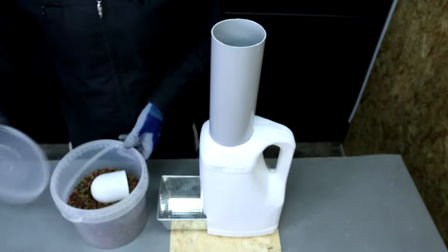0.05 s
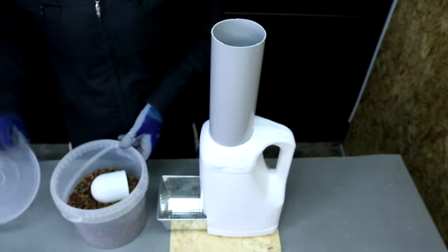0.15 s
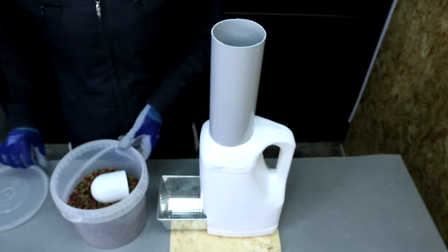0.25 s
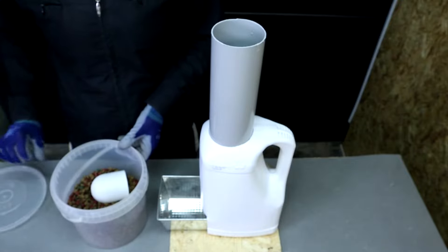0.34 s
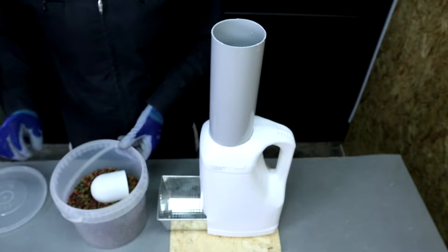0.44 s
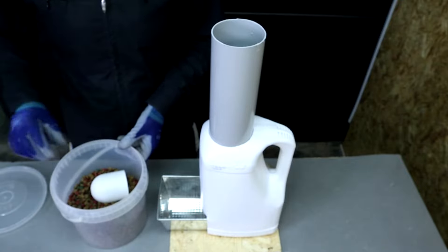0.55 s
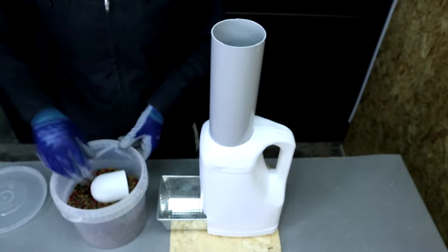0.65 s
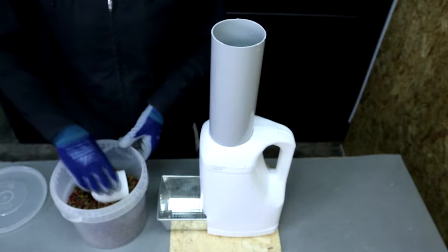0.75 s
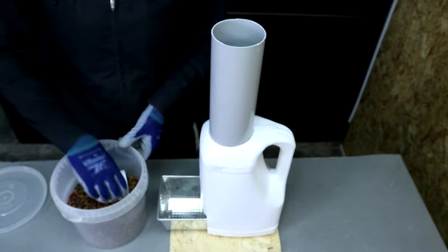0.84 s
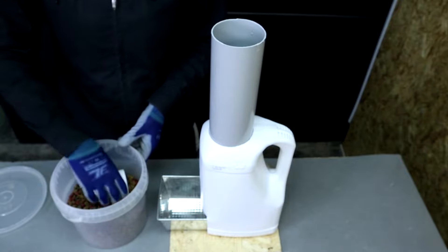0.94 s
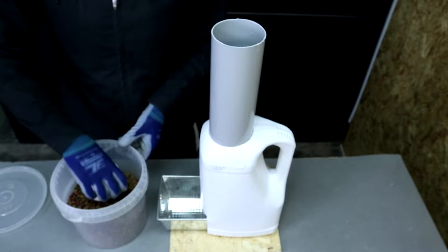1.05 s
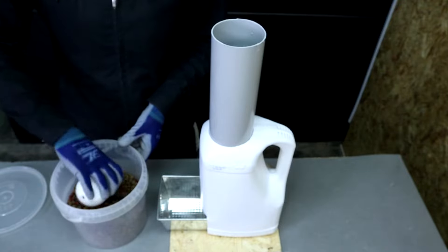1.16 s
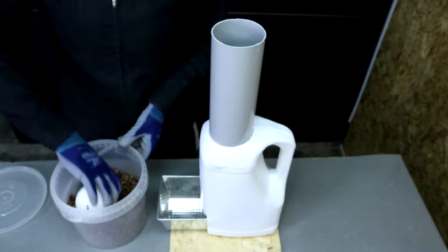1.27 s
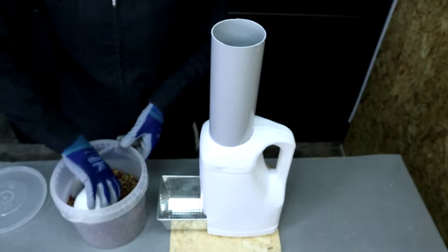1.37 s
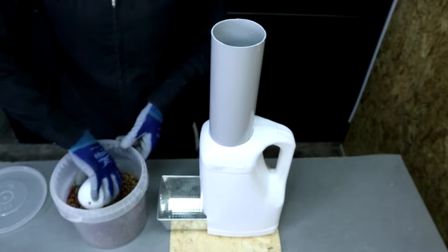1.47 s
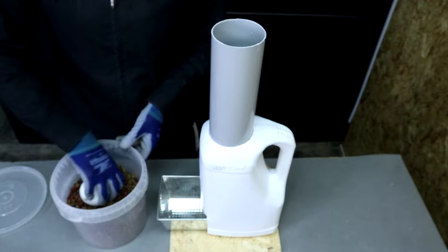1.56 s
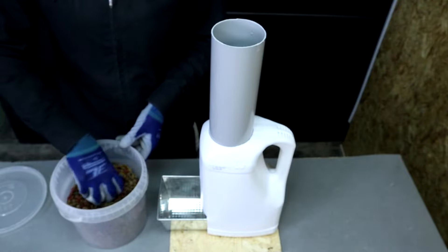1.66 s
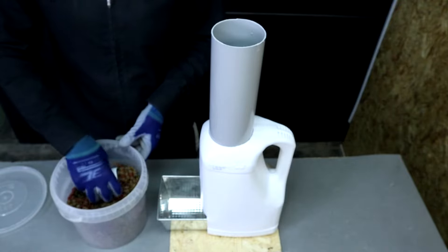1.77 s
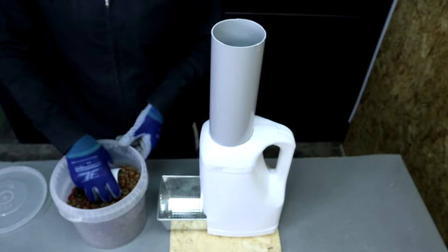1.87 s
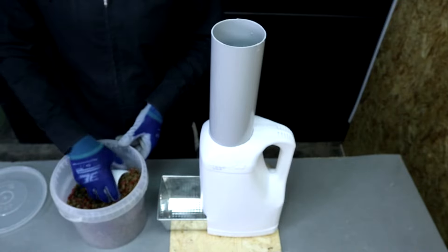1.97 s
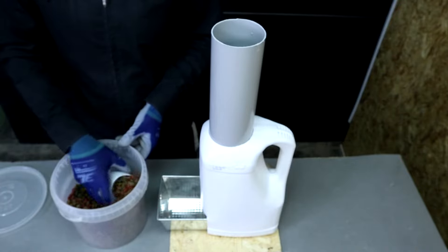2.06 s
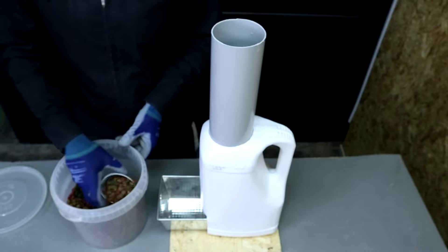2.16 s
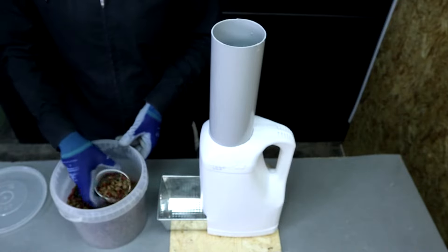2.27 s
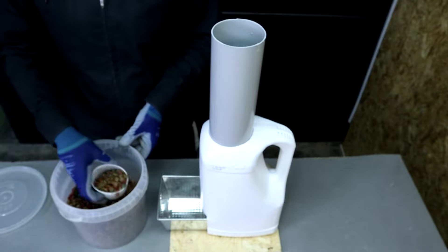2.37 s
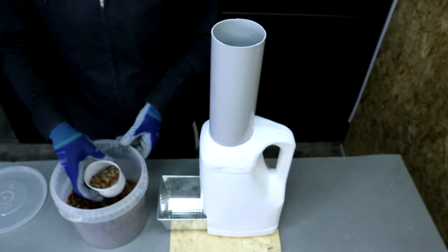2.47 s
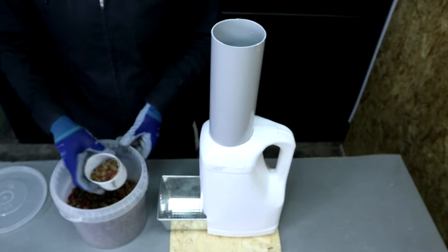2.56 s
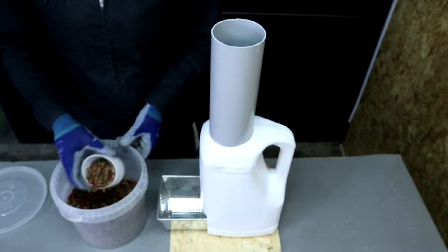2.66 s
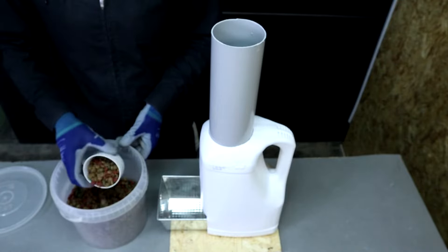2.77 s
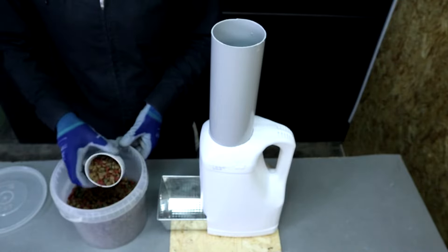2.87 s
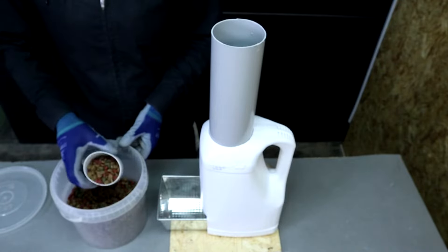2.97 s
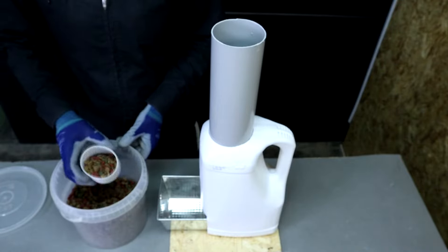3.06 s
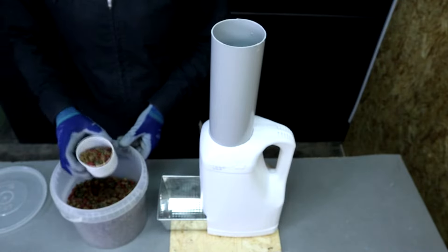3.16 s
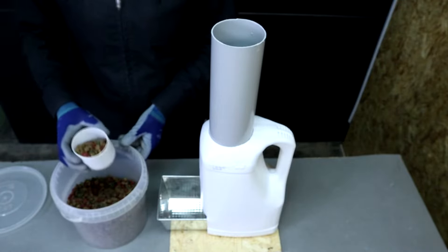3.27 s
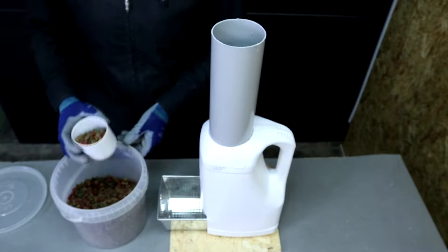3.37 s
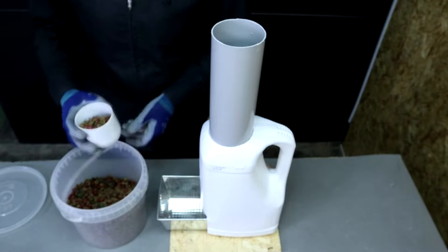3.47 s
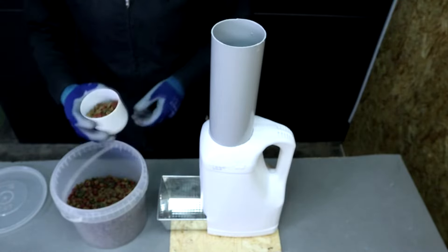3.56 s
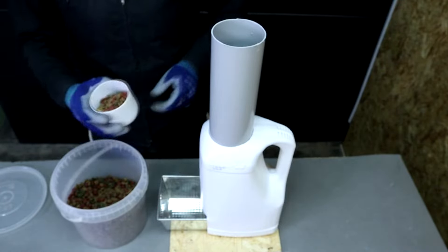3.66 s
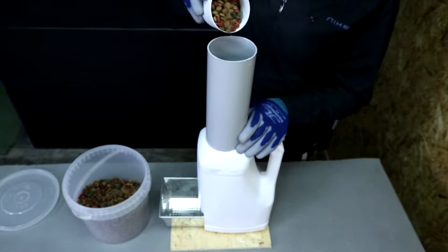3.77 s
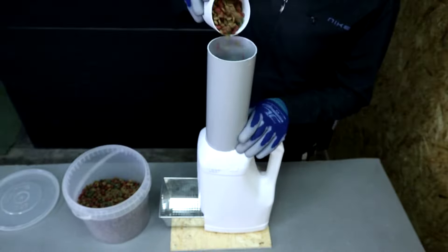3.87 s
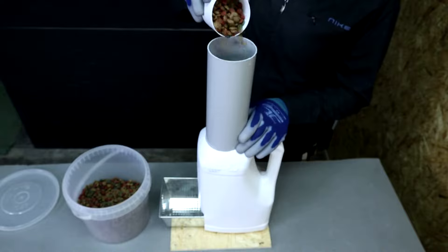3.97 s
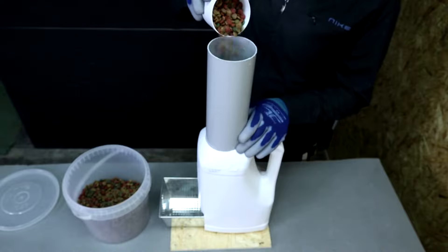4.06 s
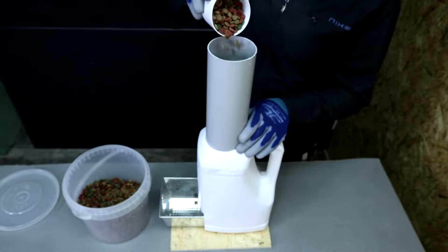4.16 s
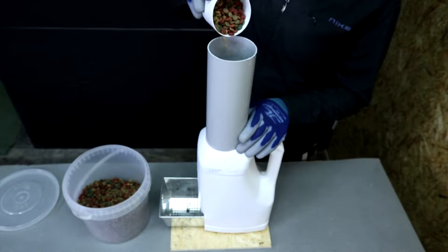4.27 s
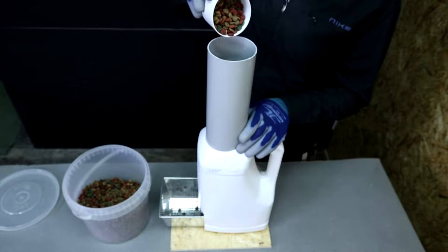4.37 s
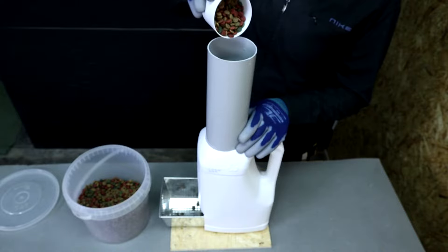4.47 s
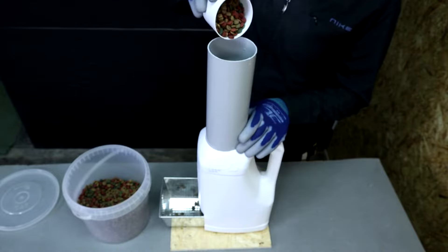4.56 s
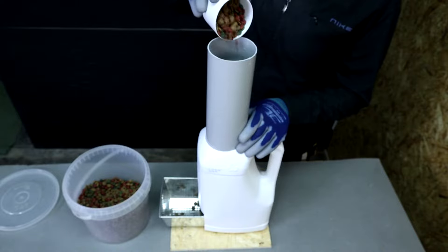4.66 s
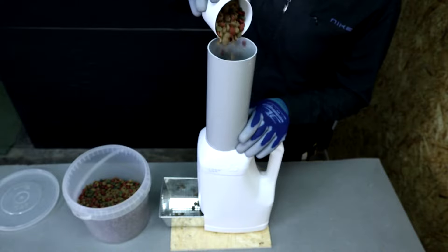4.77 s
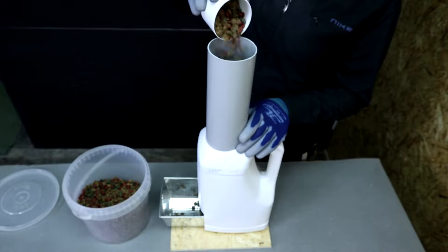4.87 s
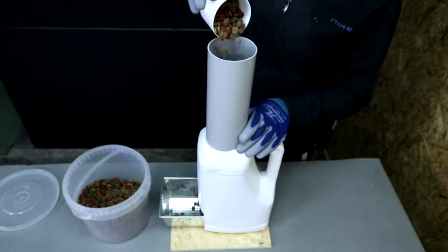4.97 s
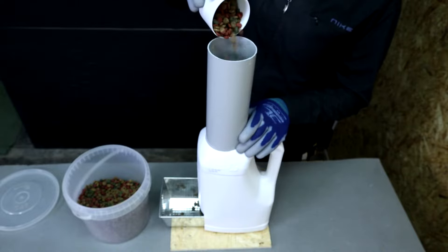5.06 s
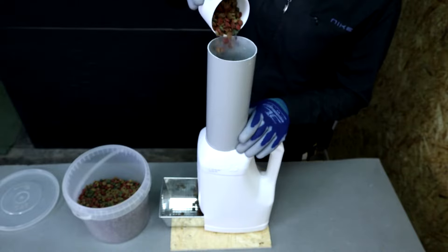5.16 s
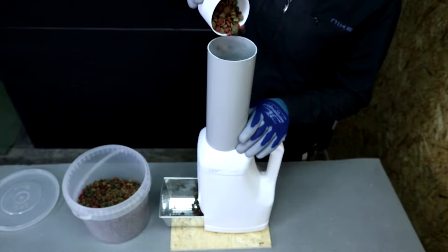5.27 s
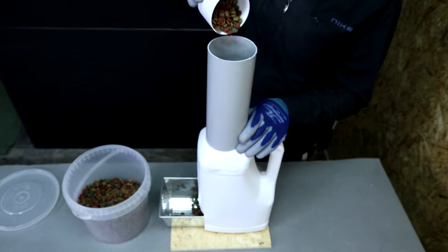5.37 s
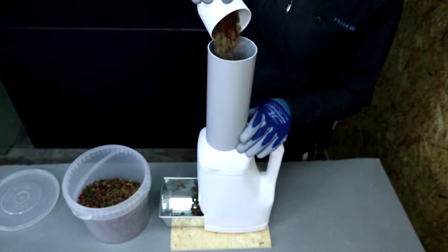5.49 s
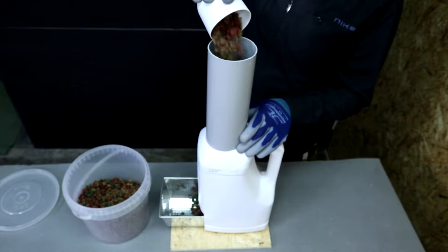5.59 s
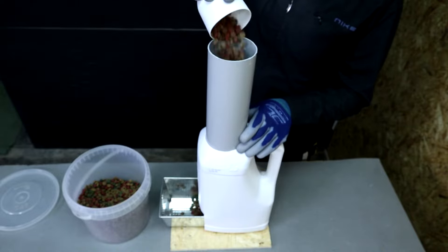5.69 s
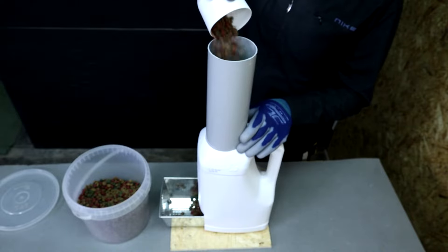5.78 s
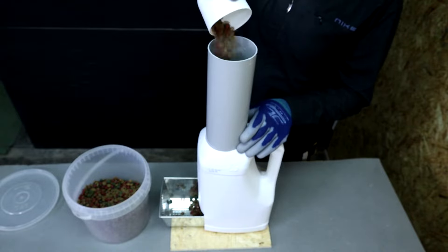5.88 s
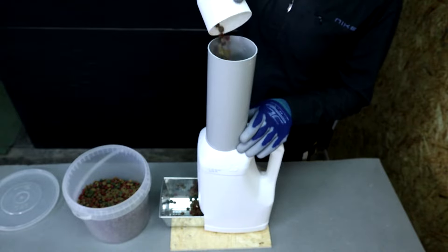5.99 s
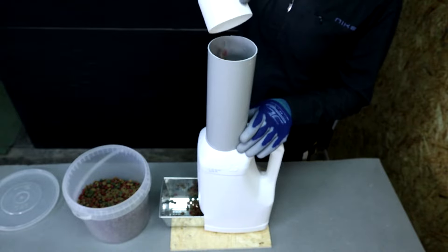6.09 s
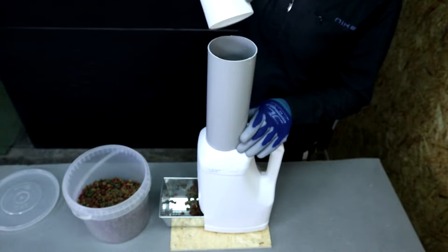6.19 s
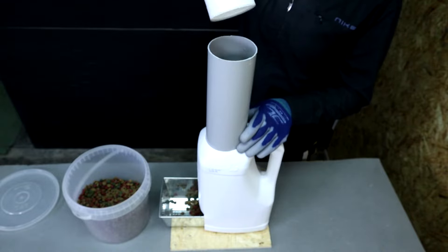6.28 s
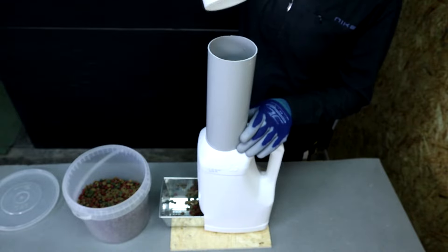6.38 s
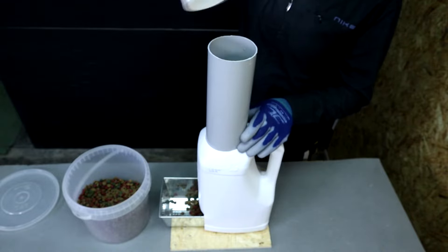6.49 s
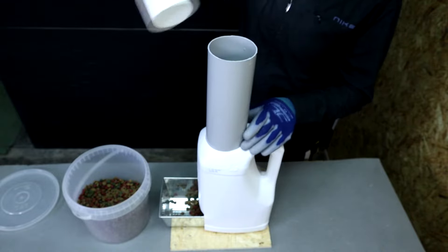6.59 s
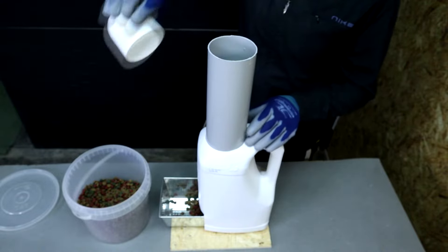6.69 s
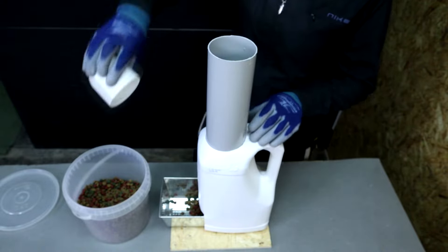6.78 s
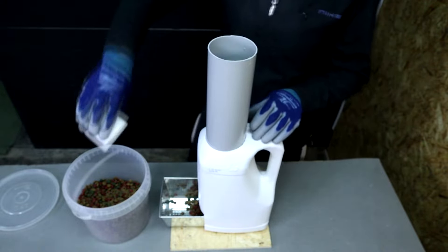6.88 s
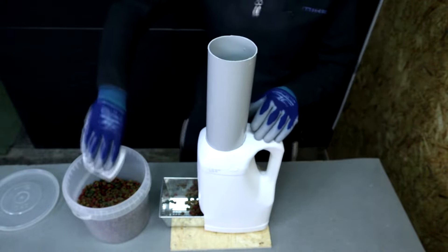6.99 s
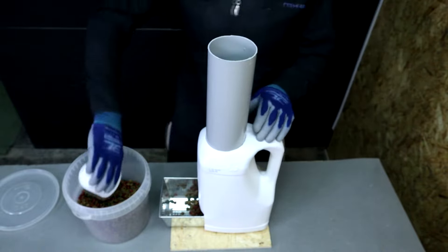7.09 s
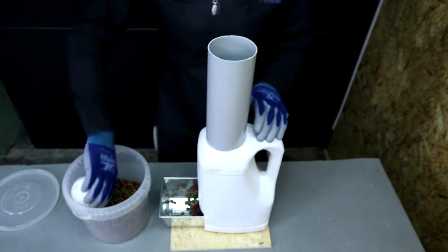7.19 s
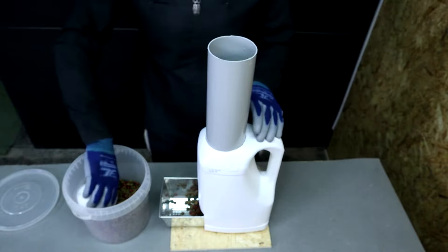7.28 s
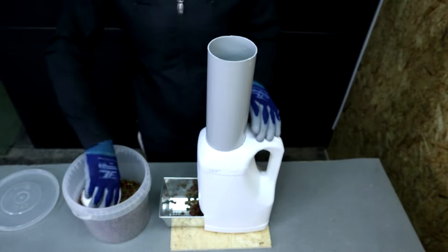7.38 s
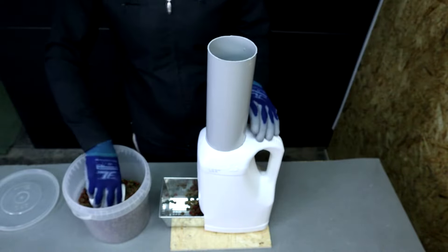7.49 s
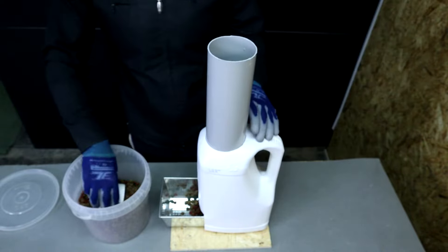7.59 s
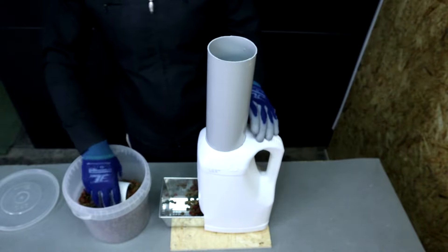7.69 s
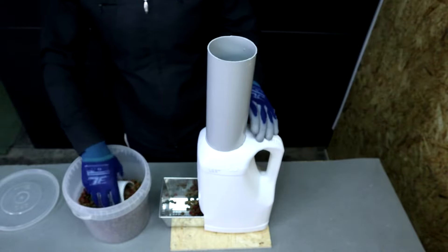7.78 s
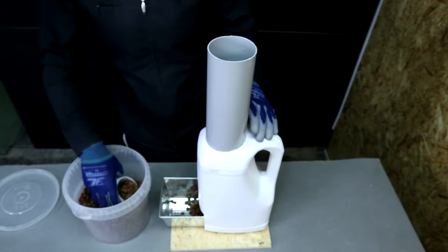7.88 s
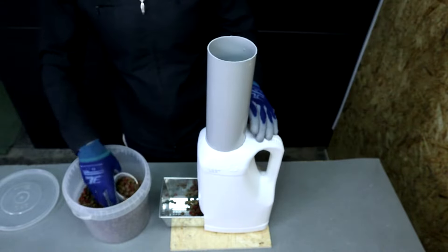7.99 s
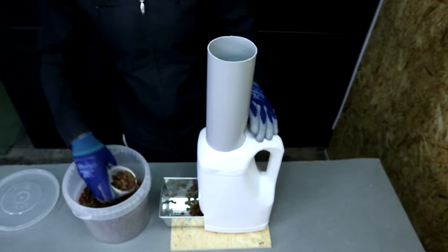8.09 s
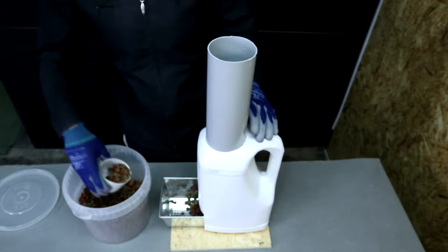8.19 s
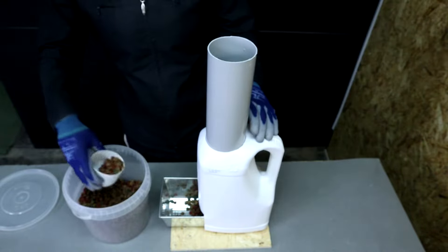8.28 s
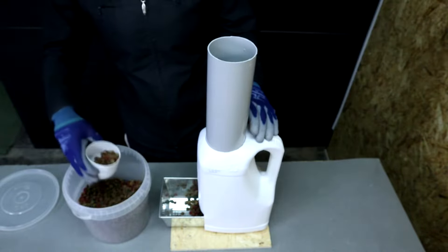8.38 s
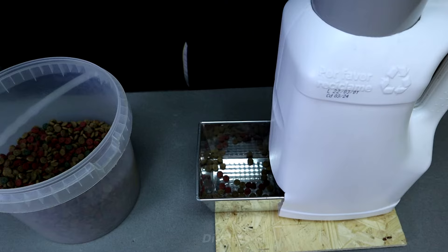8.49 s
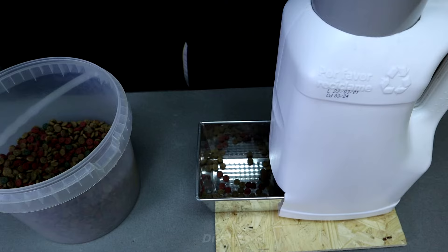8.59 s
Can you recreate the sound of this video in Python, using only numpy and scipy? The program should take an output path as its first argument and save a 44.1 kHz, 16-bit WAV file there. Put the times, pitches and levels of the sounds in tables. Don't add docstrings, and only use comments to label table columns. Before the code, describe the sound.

Close stereo sound on a workbench: a light lid flaps to rest, gloves and sleeves brush softly, and a cup crunches and drums in a tub of hard dry pellets. A pause, then a dense clattering pour rings a hollow plastic jug in two rushes, softening as a bed builds. After stray clicks, an uneven low engine rumble swells beneath another scoop, ending on a sudden close burst of pellets. Small shed, faint echo.

```python
import sys
import numpy as np
from scipy import signal
from scipy.fft import rfft, irfft, next_fast_len
from scipy.io import wavfile
from scipy.ndimage import uniform_filter1d

SR = 44100
rng = np.random.default_rng(int(sys.argv[2]) if len(sys.argv) > 2 else 0)


def gain_from_decibels(decibels):
    exponent = np.asarray(decibels, float) / 20
    return 10 ** exponent


def wrap_up_sound(samples):
    columns = np.atleast_2d(samples).T
    tamed = np.clip(columns, -1, 1)
    steps = np.round(tamed * 32767).astype(np.int16)
    wavfile.write(sys.argv[1], SR, steps)


N = 381024

# frequency in Hz, level in dB per Hz.
TUB_COLOUR = [(59, -48), (95, -8), (160, -4), (200, -12), (403, -0.5), (584, -8.5), (1000, -1.5),
              (1170, -10), (3000, -58), (3900, -65.5), (6600, -120)]


def evened(x):
    return x / np.sqrt(np.mean(x ** 2) + 1e-20)


def read(points, hz):
    f, value = np.transpose(points)
    return np.interp(np.log(hz + 1), np.log(f + 1), value)


def add(mix, s, sound):
    part = mix[..., round(s * SR):][..., :sound.shape[-1]]
    part += sound[..., :part.shape[-1]]


def unroll(rows):
    s, *columns = np.transpose(rows)
    t = np.arange(max(s[0] - .006, 0), s[-1] + .011, 1 / SR)
    return [t] + [np.interp(t, s, c) for c in columns]


def coloured(x, points):
    size = next_fast_len(x.shape[-1])
    gain = gain_from_decibels(read(points, np.fft.rfftfreq(size, 1 / SR)))
    return irfft(rfft(x, size) * gain, size)[..., :x.shape[-1]]


def band(x, lo_hz, hi_hz):
    edges = [lo_hz, min(hi_hz, SR / 2.2)]
    return signal.sosfilt(signal.butter(2, edges, "bandpass", fs=SR, output="sos"), x)


def swells(t, rows, rise):
    s, db, fall = np.transpose(rows)[:, :, None]
    at = t[::20]
    ramp = np.where(at < s, (s - at) / abs(rise), at - s) / abs(fall)
    power = (gain_from_decibels(db - 20 * ramp) ** 2).sum(axis=0)
    return np.interp(t, at, 10 * np.log10(power + 1e-12))


def tone(hz, db):
    wave = np.sin(2 * np.pi * np.cumsum(hz) / SR)
    return np.sqrt(2) * gain_from_decibels(db) * wave * signal.windows.tukey(len(hz), .006)


def knocks(colour, modes, t60, ring_db, low_hz, top_hz, stray=.03, count=36):
    t = np.arange(3072) / SR
    fall = gain_from_decibels(-60 * t / t60) + gain_from_decibels(-16 - 60 * t / .18)
    octave = np.log2(np.fft.rfftfreq(len(t), 1 / SR) + 1)
    ripples = [np.cos(2 * np.pi * (k * octave + rng.random((count, 1, 1)))) for k in (.3, .7, 1.3)]
    own_db = 2.5 * sum(ripples)
    noise = irfft(rfft(rng.standard_normal((count, 2, len(t)))) * gain_from_decibels(own_db), len(t))
    crack = evened(coloured(noise, colour)) * fall

    hz, width, db = np.transpose(modes)[:, :, None]
    weight = rng.standard_normal((count, 2, len(modes), 1)) * gain_from_decibels(db) * np.sqrt(width)
    spot = 1 + stray * rng.uniform(-1, 1, (count, 1, len(modes), 1))
    notes = weight * np.exp(-np.pi * .8 * width * t) * np.sin(2 * np.pi * hz * spot * t)
    rings = notes.sum(axis=2) * np.sqrt(abs(np.cos(np.pi / 2 * t / t[-1])))
    knock = evened(crack) + gain_from_decibels(ring_db) * evened(rings)
    return band(band(knock, low_hz, top_hz), low_hz, top_hz)


def scatter(length, at, size, which, shapes):
    taps = shapes.shape[2]
    out = np.zeros((2, length + taps))
    for n, gain, k in zip(at, size, which):
        out[:, n:n + taps] += gain * shapes[k]
    return out[:, :length]


def rattle(length, shapes, per_s, spread_db):
    lands = rng.random(length) < per_s / SR
    size = gain_from_decibels(spread_db * np.minimum(rng.exponential(1, length), 3.4)) * lands
    size[0] = gain_from_decibels(2 * spread_db)
    spots = rng.integers(0, len(shapes), length // 2000 + 1)
    drift = np.repeat(spots, 2000)[:length]
    which = (drift + rng.integers(0, 10, length)) % len(shapes)
    at = np.flatnonzero(size)
    shower = scatter(length, at, size[at], which[at], shapes)
    slow = np.sqrt(abs(uniform_filter1d(shower[0] ** 2, size=1100))) + 1e-9
    return shower / slow


def tilted(x, bright_db, split_hz):
    high = signal.sosfilt(signal.butter(1, split_hz, "highpass", fs=SR, output="sos"), x)
    return x + (gain_from_decibels(bright_db) - 1) * high


def snap_noise(t):
    return rng.standard_normal((2, len(t))) * (1 + 1.3 * np.exp(-t / .0015))


def shed_tail(t):
    return gain_from_decibels(-15 - 60 * t / .13)


def shed_air(near):
    # frequency in Hz, level in dB per Hz.
    air_colour = [(35, -30), (60, -10.5), (102, -17), (169, -23.5), (300, -23), (464, -26), (558, -29),
                  (612, -24), (788, -30.5), (1610, -32), (4960, -40.5), (9000, -48.5), (13000, -43.5)]
    # frequency in Hz, side level minus mid level in dB.
    air_side = [(60, -32), (180, -3.5), (530, 0.5), (1590, 1.5), (4750, 7.5), (14200, 6.5)]
    mid, side = evened(coloured(rng.standard_normal((2, N)), air_colour))
    power_db = 10 * np.log10(abs(uniform_filter1d(near[0] ** 2, size=900)) + 1e-12)
    recovery = np.arange(N) * 110.0 / SR
    held_db = np.maximum.accumulate(power_db + recovery) - recovery
    over_db = np.maximum(held_db + 27.5, 0)
    return gain_from_decibels(-50.5 - 1.2 * over_db) * np.array([mid, coloured(side, air_side)])


def steady_drone():
    # time in seconds, level in dB.
    drone_levels = [(0.0, -43), (0.11, -41.5), (1.4, -38.5), (2.2, -37), (3.71, -37), (4.08, -43.5),
                    (4.3, -68), (4.75, -70), (4.98, -45), (5.12, -63), (5.51, -54)]
    t, db = unroll(drone_levels)
    yield t[0], tone(40.6 + 0 * t, db)


def thuds():
    # time in seconds, peak in dB.
    thud_times = [
        (.0278, -21.5),
        (.3008, -23.5),
        (.334, -19),
        (.439, -18),
        (1.5403, -17),
        (3.6294, -32.5),
        (7.4945, -23),
        (7.694, -25.5),
    ]
    # from Hz, to Hz, decay in s, level in dB
    parts = ((250, 1200, .05, -0.5), (1200, 5000, .026, -20), (5000, 10000, .024, -27))
    t = np.arange(4000) / SR
    for s, peak_db in thud_times:
        noise = snap_noise(t)
        tap = 0
        for lo, hi, t60, db in parts:
            fall = gain_from_decibels(-60 * t / t60) + shed_tail(t)
            tap = tap + gain_from_decibels(db) * fall * evened(band(band(noise, lo, hi), lo, hi))
        yield s, gain_from_decibels(peak_db - 12.0) * tap


def lid_slaps():
    # frequency in Hz, level in dB per Hz.
    lid_colour = [(41, -39), (70, -31), (283, 3.5), (353, -1.5), (403, -20), (482, -6), (734, -7),
                  (1170, -12), (1900, -9.5), (14000, -40.5)]
    # frequency in Hz, width in Hz, level in dB.
    lid_modes = [(150, 23, 2), (418, 18, 2), (1440, 71, -15), (1970, 360, -33)]
    # contact in seconds, level in dB, seconds to the loudest wobble, seconds to fall 20 dB.
    slaps = [
        (.028, -27.5, 0.0029, 0.13),
        (.3, -25.5, 0.041, 0.18),
        (.437, -30, 0.02, 0.13),
    ]
    contact_db = 10.5
    bright_db, dull_db, dulling_s = 6, -7.5, 0.019
    shapes = knocks(lid_colour, lid_modes, t60=0.16, ring_db=-1.5, low_hz=60, top_hz=12500)
    t = np.arange(0, .3, 1 / SR)
    treble_db = dull_db + (bright_db - dull_db) * np.exp(-t / dulling_s)
    for s, db, rise, fall in slaps:
        level_db = db - np.where(t < rise, contact_db * (1 - t / rise), 20 * (t - rise) / fall)
        wobble = rattle(len(t), shapes, per_s=470, spread_db=6.0)
        yield s, gain_from_decibels(level_db) * tilted(wobble, treble_db, 1000)


def lid_flexes():
    # time in seconds, peak in dB, pitch in Hz, seconds to fall 60 dB.
    flexes = [(.031, -23.5, 208, 0.15), (.034, -25.5, 450, 0.14), (.1, -39, 452, .3), (.305, -29, 150, .12),
              (.318, -21, 340, 0.086), (.334, -13.5, 190, 0.069), (.334, -21, 430, 0.065),
              (.452, -26, 780, 0.099), (.47, -27, 857, 0.09), (.475, -26, 304, .1)]
    t = np.arange(4000) / SR
    for s, peak_db, hz, t60 in flexes:
        level = gain_from_decibels(peak_db - 60 * t / t60) * np.minimum(t / 0.0045, 1)
        note = level * np.sin(2 * np.pi * hz * t) * signal.windows.tukey(len(t), .1)
        yield s, np.array([note, .5 * note])


def climbing_engine():
    # time in seconds, pitch in Hz, level in dB.
    climb = [(.3, 44.4, -39.5), (.65, 52.8, -45), (1.1, 50.8, -60), (1.7, 54.8, -55), (2.1, 55.4, -53),
             (2.6, 56.5, -49), (3.2, 58.8, -72), (3.8, 57.6, -50.5), (4.15, 59.5, -58)]
    t, hz, db = unroll(climb)
    yield t[0], tone(hz, db)


def sleeve():
    # start in seconds, end in seconds, level in dB, from Hz, to Hz.
    swishes = [(0.637, 0.748, -50, 3140, 2990), (0.878, 0.994, -51.5, 3870, 3000),
               (3.121, 3.312, -50, 3900, 2840), (3.436, 3.535, -54, 2280, 2660),
               (3.69, 3.812, -51.5, 3890, 3900), (6.973, 7.141, -51.5, 4100, 3020),
               (7.095, 7.261, -51, 2700, 1500)]
    # start in seconds, end in
    # seconds, level in dB, from Hz, to Hz.
    rubs = [(0.632, 0.768, -47, 7900, 6980), (3.98, 4.111, -39.5, 7700, 6500),
            (8.19, 8.26, -42, 5000, 6000), (8.34, 8.5, -44.5, 7500, 6400), (2.74, 2.83, -47.5, 7000, 6000)]
    for rows, width_hz in ((swishes, 420), (rubs, 3200)):
        for start, end, level_db, from_hz, to_hz in rows:
            hz = np.linspace(from_hz, to_hz, round((end - start) * SR))
            glide = np.exp(2j * np.pi * np.cumsum(hz) / SR)
            noise = rng.standard_normal((2, len(hz), 2)) @ [1, 1j]
            slow = signal.lfilter(*signal.butter(2, width_hz, fs=SR), noise, axis=1)
            rough_db = 2.8 * evened(uniform_filter1d(rng.standard_normal(len(hz)), size=300))
            rub = evened((slow * glide).real * gain_from_decibels(rough_db))
            yield start, gain_from_decibels(level_db) * rub * signal.windows.tukey(len(hz), .7)


def scoop():
    # frequency in Hz, width in Hz, level in dB.
    tub_modes = [(401.3, 8.6, 1.5), (1003.4, 11.4, -0.5)]
    # frequency in Hz, level in dB per Hz.
    crunch_colour = [(590, -16), (1000, -9.5), (1300, -8), (1900, -4), (3000, -8), (4160, -10), (6400, -18),
                     (8530, -23), (12000, -25), (14600, -76.5)]
    # frequency in Hz, width in Hz, level in dB.
    crunch_modes = [(1883, 100, 18), (2310, 60, 5), (4030, 180, -2), (6330, 90, -17)]
    # time in seconds, crunch in dB, tub wall above crunch in dB,
    # seconds to fall 20 dB.
    strokes = [(1.1, -48, 1.5, -0.2), (1.45, -40.5, 2.5, 0.4), (1.565, -23.5, 6, 0.1161),
               (1.663, -22, 0.5, 0.132), (1.8, -27.5, 1, 0.1229), (2.05, -33.5, -4.5, 0.19),
               (2.245, -32.5, -11, 0.05), (2.32, -28.5, -13, 0.09), (2.41, -44, -6.5, -1.3),
               (2.795, -39, -10, 0), (3.5, -55.5, -6, 0.5), (4.1, -40, -18.5, 0.49), (7.34, -36.5, 8, 0.05),
               (7.4, -29.5, 8.5, 0.03), (7.42, -28, 8, 0.04), (7.505, -32, 10, .06), (7.535, -32, 11, 0.12),
               (7.64, -54, -7, .1), (7.71, -35, 7.5, .05), (7.74, -30.5, 8.5, 0.1059),
               (7.92, -37.5, 1.5, 0.28), (8.05, -40.5, -14, 0.18), (8.2, -45, 7, 0.34)]
    # time in seconds, crunch in dB, tub wall above crunch in dB,
    # seconds to fall 20 dB.
    slips = [(.995, -48.5, -3, 0.24), (1.373, -40.5, -13, 0.22), (1.94, -33.5, 1.5, 0.46),
             (2.65, -66, 11.5, 0.7), (2.875, -35.5, -12, 0.083), (3.644, -48, 1.5, 0.22),
             (3.95, -67, -14, 0.32), (3.99, -34, -26, 0.15), (5.52, -52, -16, 0.26),
             (7.29, -30.5, 1.5, 0.32), (8.308, -41, -3, 0.32), (8.429, -39, -1.5, 0.29)]
    # start in seconds, end in seconds.
    digs = [
        (.95, 4.12),
        (5.511, 5.6),
        (7.264, 8.514),
    ]
    wall = knocks(TUB_COLOUR, tub_modes, t60=0.046, ring_db=1.0, low_hz=69.5, top_hz=12600)
    crunch = knocks(crunch_colour, crunch_modes, t60=0.094, ring_db=-13.0, low_hz=630, top_hz=10500)

    def push(t, wall_share):
        levels = []
        for rows, rise in ((strokes, 0.91), (slips, 0.084)):
            moves = [(s, db + wall_share * wall_db, fall) for s, db, wall_db, fall in rows]
            levels.append(gain_from_decibels(swells(t, moves, rise)))
        return np.hypot(*levels)

    for start, end in digs:
        t = np.arange(start, end, 1 / SR)
        yield start, push(t, 1) * rattle(len(t), wall, per_s=450, spread_db=3.0)
        yield start, push(t, 0) * rattle(len(t), crunch, per_s=800, spread_db=4.3)


def clicks():
    # time in seconds, peak in dB, centre in Hz.
    click_times = [(.9852, -32, 3800), (1.363, -28, 3800), (1.6206, -22, 2200), (1.645, -27, 7000),
                   (1.6625, -14, 2500), (1.99, -41, 6500), (2.2314, -28, 7140), (2.3131, -22, 2400),
                   (2.322, -27, 7150), (2.5853, -50, 5500), (2.65, -33.5, 4400), (2.7561, -47, 8000),
                   (2.7853, -30, 2800), (2.8736, -17.5, 2820), (2.876, -33, 5440), (3.9502, -23, 7000),
                   (3.9973, -19.5, 7000), (4.015, -18, 6500), (4.0498, -22.5, 6500), (4.855, -21, 2480),
                   (4.854, -22, 6500), (4.888, -23.5, 6500), (4.941, -25.5, 3900), (4.977, -18.5, 6400),
                   (4.9874, -24, 6500), (5.002, -22, 4100), (6.058, -17, 6700), (6.3585, -26, 7000),
                   (6.61, -37, 2200), (7.269, -27, 3000), (7.281, -24, 6100), (7.9274, -25, 2500),
                   (8.0194, -32, 6200), (8.039, -26, 6500), (8.1047, -26, 2630), (8.1868, -25, 5000),
                   (8.264, -32, 7980), (8.299, -21, 2830), (8.3294, -29, 6000), (8.428, -21.5, 6500),
                   (8.46, -23.5, 6000), (8.506, -30, 2000), (8.514, -15.5, 2000), (8.515, -22, 6500)]
    t = np.arange(4000) / SR
    fall = gain_from_decibels(-60 * t / 0.041) + shed_tail(t)
    for s, peak_db, hz in click_times:
        noise = snap_noise(t)
        lo, hi = hz / 1.45, hz * 1.45
        click = evened(band(band(noise, lo, hi), lo, hi)) + gain_from_decibels(-18.5) * evened(band(noise, 1200, 15000))
        yield s, gain_from_decibels(peak_db - 11.0) * fall * click


def cup_filling():
    # frequency in Hz, level in dB per Hz.
    cup_colour = [(700, -19), (1400, -10.5), (2000, -2), (2750, -2), (3300, -6), (4500, -14), (8000, -19.5),
                  (14600, -54)]
    # frequency in Hz, width in Hz, level in dB.
    cup_modes = [(1900, 70, 2), (2150, 60, -5), (2700, 80, 1), (3080, 73, 1), (4100, 60, -5)]
    # time in seconds, level in dB, seconds to fall 20 dB.
    fills = [(1.99, -34.5, 0.17), (2.1, -38.5, 0.23), (2.21, -33, 0.09), (2.25, -27, 0.12),
             (2.32, -24, 0.0542), (2.37, -27.5, 0.07), (2.41, -33, 0.04), (2.46, -43, -0.05),
             (2.54, -67, .2), (2.91, -41.5, 0.1)]
    shapes = knocks(cup_colour, cup_modes, t60=0.046, ring_db=-3.0, low_hz=596, top_hz=11000)
    t = np.arange(1.85, 3.1, 1 / SR)
    yield t[0], gain_from_decibels(swells(t, fills, 0.99)) * rattle(len(t), shapes, per_s=1200, spread_db=3.5)


def darkened(x):
    # frequency in Hz, width in Hz.
    jug_dips = [(195, 164), (485, 103)]
    for hz, width in jug_dips:
        x = signal.lfilter(*signal.iirnotch(hz, hz / width, SR), x)
    return band(band(x, 140, 17000), 140, 17000)


def pour():
    # frequency in Hz, level in dB per Hz.
    jug_colours = [
        [(88, -57), (150, 8.5), (192, -66), (376, -18), (474, -53), (608, -2), (1060, -5.5), (1550, -7.5),
         (1710, -4.5), (3410, -6), (10600, -14.5), (14600, -23)],
        [(88, -39), (150, -28), (230, -4.5), (323, -3.5), (521, -26), (608, -7.5), (874, -10), (2560, -13.5),
         (3340, -13), (11000, -20.5), (14600, -30)],
        [(120, -48), (200, -8), (308, 18.5), (349, -30), (587, 2), (3940, 4.5), (10600, 0), (14600, -18)],
    ]
    # frequency in Hz, width in Hz, level in dB.
    empty_modes = [(374.3, 7.4, -9), (619.3, 8.4, -3.5), (1324, 34, -0.5), (1573, 42, 2), (1896, 50, 0.5),
                   (2233, 15, -3), (2830, 46, -10), (3110, 27, -5), (3393, 50, 0), (3780, 27, -5.5),
                   (4400, 20, -12), (5200, 51, -7.5), (6030, 46, -27), (6500, 48, -35), (6300, 52, -34)]
    # frequency in Hz, width in Hz, level in dB.
    bedded_modes = [(601.2, 13, 3), (1222, 21, -4), (1554, 30, -0.5), (2070, 190, 2), (2740, 13, -6),
                    (3283, 29, -0.5), (3677, 84, 0.5), (3830, 110, -6), (4185, 32, -2.5), (5240, 75, -6.5),
                    (6160, 110, -6), (7000, 78, -6.5)]
    # frequency in Hz, width in Hz, level in dB.
    hollow_modes = [(297, 15, -6), (384, 9.7, 3.5)]
    # time in seconds, peak in dB, seconds to fall 60 dB.
    landings = [(4.113, 7, 0.053), (4.156, 0.5, 0.11), (4.184, 2, 0.065), (4.256, -5, .09),
                (4.268, -0.5, .06), (4.295, -1.5, 0.061), (4.339, -6.5, 0.11), (4.378, 1, 0.056),
                (4.443, 2, 0.086), (4.505, -2, 0.066), (4.543, -3, .09), (4.619, -3, 0.065),
                (5.02, 4, 0.033), (5.034, -4, 0.12), (5.049, 3, 0.066), (5.213, -5, 0.087),
                (5.281, -8.5, 0.051), (5.299, -2, 0.069), (5.347, -3, .08), (5.439, -5, 0.07),
                (5.594, -5.5, 0.059), (5.661, -3.5, 0.099), (5.677, -1.5, 0.078), (5.741, -5, .07),
                (5.795, -1.5, .06), (5.968, -17, 0.072), (8.54, 10.5, 0.042), (8.563, -3.5, 0.13),
                (8.591, 10, 0.046)]
    # time in seconds, level in dB, seconds to fall 20 dB.
    surges = [(4.122, -22.5, -0.2), (4.166, -14.5, 0.17), (4.205, -18.5, 0.16), (4.273, -17.5, .15),
              (4.31, -21.5, 0.14), (4.36, -17.5, .15), (4.41, -22, 0.22), (4.465, -15.5, 0.1647),
              (4.49, -19.5, 0.14), (4.569, -15.5, 0.1), (4.645, -21, 0.16), (4.71, -25.5, .2),
              (4.858, -40.5, -7), (4.99, -35.5, 0.2), (5.031, -14, 0.38), (5.138, -16, 0.34),
              (5.3, -20.5, 0.2), (5.356, -16.5, .12), (5.449, -16, 0.3), (5.598, -23.5, 0.06),
              (5.63, -27.5, 0.06), (5.688, -14, 0.1476), (5.745, -18, 0.1564), (5.802, -18.5, 0.28),
              (5.974, -22.5, 0.03), (5.88, -25, 0.2453), (6.03, -28, 0.23), (6.1, -28, 0.19),
              (6.18, -28.5, 0.23), (6.25, -31, 0.23), (6.36, -32.5, 0.02), (8.555, -29, -0.3),
              (8.585, -26.5, -0.2), (8.63, -28, -2)]
    # start in seconds, end in seconds.
    pours = [
        (4.116, 5.018),
        (5.021, 5.511),
        (5.575, 6.71),
        (8.54, 8.64),
    ]
    walls = (empty_modes, bedded_modes, bedded_modes)
    ring_dbs = (-1.5, -4, -6)
    empty, bedded, close = [knocks(colour, modes, .03, ring_db, low_hz=180, top_hz=16600, stray=.013)
                            for colour, modes, ring_db in zip(jug_colours, walls, ring_dbs)]
    hollow = knocks(TUB_COLOUR, hollow_modes, .03, ring_db=18.0, low_hz=230, top_hz=900, count=12)
    states = (empty, empty, bedded, close)
    hollow_dbs, grain_dbs = (-11.5, -14.5, -29, -12.0), (4, 4, 3, 3.5)
    for (start, end), shapes, hollow_db, grain_db in zip(pours, states, hollow_dbs, grain_dbs):
        t = np.arange(start, end, 1 / SR)
        level_db = swells(t, [row for row in surges if start <= row[0] < end], 0.28)
        shower = rattle(len(t), shapes, per_s=1000, spread_db=grain_db)
        shower = shower + gain_from_decibels(hollow_db) * rattle(len(t), hollow, per_s=300, spread_db=0.0)
        yield t[0], darkened(gain_from_decibels(level_db - 0.5) * shower)
        for s, peak_db, t60 in landings:
            if t[0] - .03 <= s <= t[-1]:
                clump = rattle(2500, shapes, per_s=1800, spread_db=3.0)
                fall_db = 60 * np.arange(2500) / SR / t60
                yield s, darkened(gain_from_decibels(peak_db - 13.0 - fall_db) * clump)


def hum():
    # time in seconds, level in dB, seconds to fall 20 dB.
    hum_swells = [(4.78, -50.5, 0.12), (5.46, -50.5, 0.09), (6.08, -46, 0.28), (7.0, -55.5, 0.48),
                  (7.4, -47, 0.21), (8.45, -38, .5)]
    t = np.arange(4.116, 8.611, 1 / SR)
    yield t[0], tone(161.7 + 0 * t, swells(t, hum_swells, 2.3))


def idling_engine():
    # time in seconds, cycles a second, load in dB,
    # lope from 0 to 1 (how unevenly it fires).
    engine_path = [(5.51, 10.2, -40.5, 0), (6.3, 9.7, -45, 0.1), (6.7, 11.3, -48, 1.07),
                   (7.08, 15, -38.5, 0.7), (7.2, 12.8, -30.5, 0), (8.1, 13.4, -28.5, 0.35),
                   (8.25, 12.0, -32.5, 0.64), (8.38, 11.8, -28.5, 0.56), (8.5, 12.3, -29, 0.6)]
    wall_hz, wall_width_hz = 41.2, 7
    t, cycles, load_db, lope = unroll(engine_path)

    def waver():
        drift = uniform_filter1d(rng.standard_normal(len(t)), size=4000)
        return 4.5 * evened(uniform_filter1d(drift, size=4000))

    for order, order_db in ((3, 1), (4, -1), (5, -2.5)):
        hz = order * cycles
        wall_loss_db = 20 * (1 - lope) * np.log10(1 + ((hz - wall_hz) / wall_width_hz) ** 2)
        waver_db = waver() * (order > 3)
        yield t[0], tone(hz, load_db + order_db + waver_db - wall_loss_db)
    yield t[0], tone(83.5 + 0 * t, load_db - 16 + waver())


def scene():
    # frequency in Hz, side level minus mid level in dB.
    side_gain = [(60, -33), (130, -50), (290, -16), (620, -6.5), (1360, -1.5), (2970, 6), (6490, 7),
                 (14200, 8.5)]
    near = np.zeros((2, N))
    for source in (thuds, lid_slaps, lid_flexes, sleeve, scoop, clicks, cup_filling, pour):
        for s, sound in source():
            add(near, s, sound)
    lean = gain_from_decibels(-21.0) * band(near[0], 1300, 5100)
    near[1] = gain_from_decibels(-5.0) * coloured(near[1], side_gain) - lean
    mid, side = near + shed_air(near)
    for engine in (steady_drone, climbing_engine, hum, idling_engine):
        for s, sound in engine():
            add(mid, s, sound)
    t = np.arange(N) / SR
    join = np.clip(abs(t - 5.511) / .004, .3, 1)
    return np.array([mid + side, mid - side]) * join


def top_cut(x):
    return signal.sosfilt(signal.butter(12, 14770, fs=SR, output="sos"), x)


def record(dry):
    edge = signal.firwin(255, 14300, window=("kaiser", 6), fs=SR)
    held = signal.oaconvolve(1.164 * np.tanh(dry / 1.178), edge[None], "same", axes=1)
    return top_cut(held)


dry = scene()
out = record(dry)
wrap_up_sound(out)
```